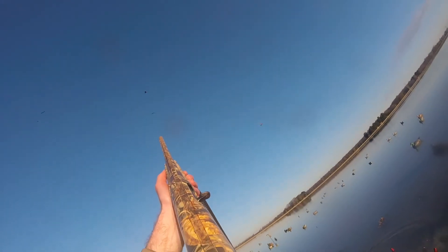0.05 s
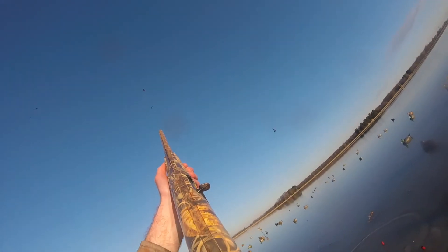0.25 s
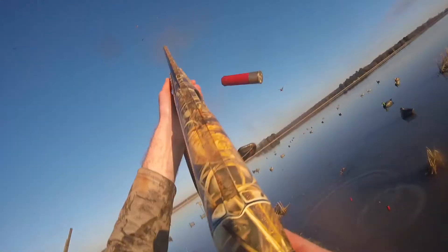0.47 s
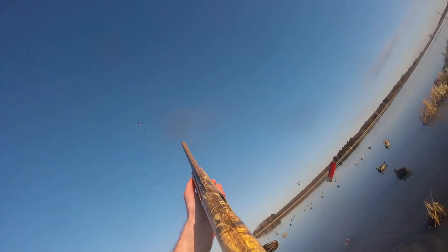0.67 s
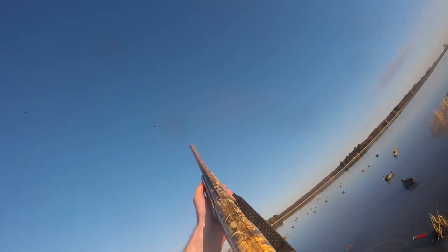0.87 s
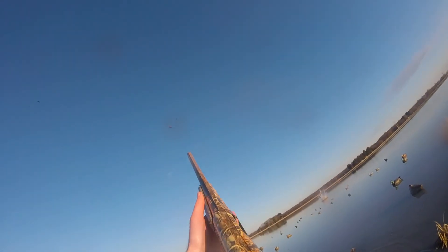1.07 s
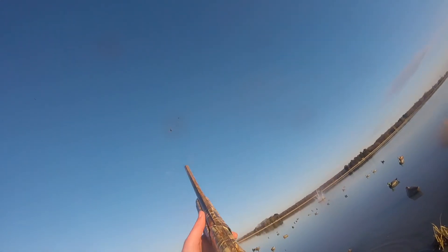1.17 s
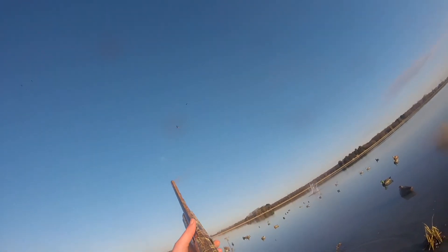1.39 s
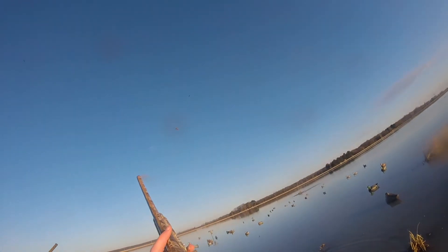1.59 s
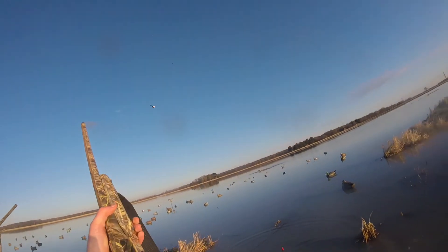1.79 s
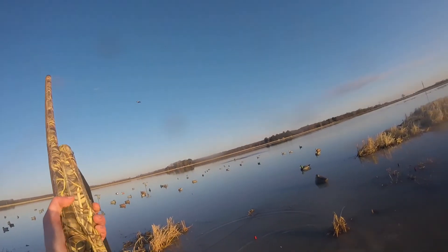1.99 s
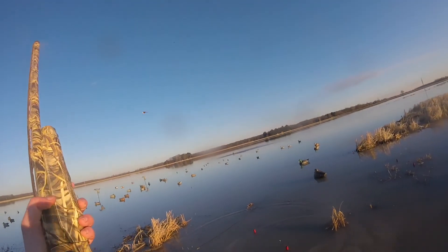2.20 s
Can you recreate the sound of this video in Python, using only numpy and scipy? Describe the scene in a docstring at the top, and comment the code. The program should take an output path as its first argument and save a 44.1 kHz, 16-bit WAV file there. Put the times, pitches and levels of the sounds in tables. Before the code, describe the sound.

Sharp, distorted shotgun shots sound close to a microphone worn by a hunter: a quick pair, the gun's action clacking, a dull knock, then a last shot after a pause. Faint echoes return across the water over low wind rumble.

```python
"""Three shotgun blasts over a marsh, heard from a small camera in a housing that the hunter wears.
Two come from a gun alongside; between them the hunter fires, the action cycles and the recoil jolts
the camera. Each blast, a shock front and a roar of gas, overloads the microphone and rings the housing.
Thin echoes return from the far shore and clothing scuffs, over low wind rumble and a faint hiss of air."""
import sys
import numpy as np
from scipy import signal
from scipy.fft import rfft, irfft, next_fast_len
from scipy.io import wavfile

SR = 44100
rng = np.random.default_rng(int(sys.argv[2]) if len(sys.argv) > 2 else 0)


def int16_out(signal):
    """Quantize to a 16-bit WAV file."""
    q = np.round(np.clip(np.atleast_2d(signal).T, -1, 1) * 32767)
    wavfile.write(sys.argv[1], SR, q.astype(np.int16))


N = 99225
TIME = np.arange(N) / SR


def from_db(db):
    """Decibels to gain."""
    return 10 ** (np.asarray(db) / 20)


def fader(rows):
    """A gain ride through (t/s, level/dB) points."""
    return from_db(np.interp(TIME, *np.transpose(rows)))


def flutter(depth_db, rate_hz):
    """A gain that wavers at random."""
    slow = signal.sosfilt(signal.butter(2, rate_hz, fs=SR, output="sos"), rng.standard_normal(N))
    return from_db(depth_db * slow / slow.std())


def burst(start, t60, hold=0, attack=1 / SR):
    """Noise with an attack, a hold and a decay, all in seconds."""
    age = TIME - start
    decay = from_db(-60 * np.maximum(age - hold, 0) / t60)
    return rng.standard_normal(N) * np.clip(age / attack, 0, 1) * decay


# resonances of the camera housing: f/Hz, width/Hz, boost/dB
HOUSING_PEAKS = [(1506, 140, 6), (2250, 270, -3), (2635, 160, 6.5), (2880, 260, 8), (3923, 180, 5),
                 (4810, 120, 5), (7320, 190, 4.5)]

def equalise(x, curve, housed=True):
    """Unit-power EQ along an (f/Hz, level/dB) curve, with the housing's ring added if housed."""
    size = next_fast_len(2 * N) // 2 * 2
    hz = np.arange(size // 2 + 1) * SR / size
    curve_hz, curve_db = np.transpose(curve)
    db = np.interp(np.log(hz + 1), np.log(curve_hz), curve_db)
    if housed:
        db += sum(boost / (1 + (2 * (hz - f) / width) ** 2) for f, width, boost in HOUSING_PEAKS)
    gain = from_db(db)
    cepstrum = irfft(np.log(gain / np.sqrt(np.mean(gain ** 2))))
    # minimum phase: nothing rings ahead of a hit
    cepstrum[1:size // 2] *= 2
    cepstrum[size // 2 + 1:] = 0
    return irfft(rfft(x, size) * np.exp(rfft(cepstrum)))[:N]


# sub-heavy tone of the wind: f/Hz, level/dB
WIND_EQ = [(8, -11), (18, 2.5), (32, 1), (55, -17), (90, -29.5), (180, -45.5), (500, -71), (2000, -100)]
# swells of the rumble: t/s, level/dB
WIND_RIDE = [(0, -26), (.12, -30.5), (.3, -36), (.42, -26.5), (.52, -21), (.57, -28), (.63, -17.5),
             (.71, -26.5), (.83, -44.5), (1.0, -36), (1.25, -40), (1.48, -25.5), (1.56, -37.5),
             (1.82, -30.5), (1.95, -34.5), (2.12, -42.5), (2.25, -58.5)]

def wind():
    """Slow buffeting on the microphone makes a low rumble."""
    return fader(WIND_RIDE) * equalise(rng.standard_normal(N), WIND_EQ, housed=False)


# soft tone of the open air: f/Hz, level/dB
AIR_EQ = [(90, 7), (200, 4), (400, 1), (900, -3.5), (1600, -4.5), (3000, -12), (5500, -16.5), (9000, -22),
          (12500, -28.5), (15500, -55)]
# the hiss dips after the shots and swells back before the last: t/s, level/dB
AIR_RIDE = [(0, -50.5), (.19, -51), (.4, -59.5), (.62, -57.5), (.69, -64), (.75, -65.5), (.9, -63.5),
            (1.15, -59.5), (1.45, -52.5), (1.8, -52.5), (2.04, -51), (2.12, -51.5), (2.25, -75)]

def air():
    """A faint, slightly gusty bed of open-air hiss."""
    hiss = equalise(rng.standard_normal(N), AIR_EQ)
    return fader(AIR_RIDE) * flutter(depth_db=0.5, rate_hz=25) * hiss


# returns from reeds and shore, one ahead of the first blast: t/s, level/dB, hold/s
ECHO_CUES = [(0.816, -56.5, .027), (0.932, -61.5, 0.035), (0.98, -52.5, 0.016), (1.024, -58.5, 0.0099),
             (1.084, -52, 0.025), (1.156, -54, 0.0037), (1.174, -52.5, .07), (1.323, -49.5, 0.023),
             (1.382, -58.5, 0.044), (1.437, -52, 0.034), (1.537, -51.5, 0.027), (1.577, -56, 0.049),
             (0.076, -54, 0.06), (2.199, -48, 0.011)]
# thin upper-mid tone of the returns: f/Hz, level/dB
ECHO_EQ = [(200, -12.5), (900, -10), (1700, 1.5), (2200, -3), (2700, -1.5), (3450, 0), (3750, -11),
           (4250, -2), (5100, -12), (5800, -3.5), (6500, -16), (11000, -31), (15000, -48.5)]

def echoes():
    """Reports come back thin and smeared from reed beds and the tree line."""
    returns = sum(from_db(db) * burst(t, t60=0.17, hold=hold, attack=0.0022)
                  for t, db, hold in ECHO_CUES)
    return equalise(returns, ECHO_EQ)


# shots, the second the hunter's own:
# t/s, crack/dB, pressure pulse/dB, pulse length/s, gas roar/dB, reflection/dB, tail/dB, tail t60/s
SHOT_CUES = [(0.2108, 15, -7, .0008, -0.5, -14.5, -21.5, 0.23),
             (0.4495, 20, -14, 0.00058, 3, -26, -30.5, 0.35),
             (2.0437, 16.5, -8, 0.00055, 2, -17.5, -22.5, 0.25)]
# tone of the blast, one curve a shot: f/Hz, level/dB
SHOT_EQS = [
    [(40, -11.5), (130, -0.5), (320, 1), (480, -2.5), (750, -2.5), (1080, 4.5), (1500, -9), (2000, -1),
     (2800, -5.5), (4000, -1.5), (5700, -14), (8500, -15.5), (15000, -27)],
    [(40, -8.5), (240, 2.5), (600, -9), (780, -4), (1450, 0), (1900, -7), (2500, -3.5), (3100, 3),
     (4300, -6), (4900, 0), (5800, -13), (7500, -9), (15000, -29)],
    [(40, -12), (300, 2.5), (500, -3), (700, 1), (950, -10.5), (1300, -0.5), (1600, -4.5), (2400, -1.5),
     (3900, 1), (5200, -12.5), (7000, -2), (15000, -40)],
]
# tone of the scatter off the marsh: f/Hz, level/dB
TAIL_EQ = [(50, -0.5), (120, -1), (300, -2), (700, -3), (1300, 0), (2200, -0.5), (4500, -5.5),
           (6200, -10.5), (8000, -17.5), (15000, -42)]

def blasts():
    """A shock front with suction behind it, a short roar of gas, its reflection, and marsh scatter."""
    direct, tails = 0, 0
    highpass = signal.butter(2, 5500, "high", fs=SR, output="sos")
    for cue, shot_eq in zip(SHOT_CUES, SHOT_EQS):
        t, crack_db, pulse_db, pulse_s, roar_db, reflection_db, tail_db, tail_t60 = cue
        front = (TIME >= t) * 1.0
        crack = from_db(crack_db) * np.diff(front, prepend=0)
        phase = np.maximum(TIME - t, 0) / pulse_s
        pulse = from_db(pulse_db) * front * (1 - phase) * np.exp(-phase)
        roar = from_db(roar_db) * burst(t, t60=0.012, hold=0.0014, attack=0.0005)
        reflection = from_db(reflection_db) * burst(t + 0.0065, t60=0.044)
        direct += equalise(roar + reflection - (crack + pulse), shot_eq)
        sizzle = from_db(-5.5) * signal.sosfilt(highpass, burst(t, t60=0.16, attack=0.012))
        wash = burst(t, t60=tail_t60, attack=0.012)
        tails += from_db(tail_db) * (wash + sizzle)
    scatter = flutter(depth_db=3, rate_hz=450)  # separate returns within the tail
    return direct + equalise(tails * scatter, TAIL_EQ)


# clacks of the guns' moving parts: t/s, level/dB, t60/s
CLACK_CUES = [(0.336, -42.5, .04), (.3465, -42.5, 0.035), (0.4449, -15.5, 0.043), (0.477, -21.5, 0.034),
              (0.602, -43, .012), (.6095, -43, 0.0084), (0.6262, -47.5, 0.0049), (2.166, -56, 0.012)]
# bright, metallic tone of the action: f/Hz, level/dB
CLACK_EQ = [(200, -15.5), (1200, -10), (2900, 2), (5000, -1), (7000, 2), (9000, -18), (15000, -16.5)]

def gun_actions():
    """Bolt and lock snap home in short, bright rattles."""
    clacks = sum(from_db(db) * burst(t, t60) for t, db, t60 in CLACK_CUES)
    return equalise(clacks, CLACK_EQ)


# modes of the camera mount: f/Hz, level/dB, t60/s
MOUNT_MODES = [(182, -18, 0.063), (1378, 0, 0.0076), (2470, -12.5, 0.0094), (6370, -20.5, 0.0097)]
# tone of the grit on the knock: f/Hz, level/dB
GRIT_EQ = [(200, 2.5), (1400, -2.5), (3000, 4), (6500, 0.5), (10000, -14.5), (15000, -13.5)]

def mount_knock():
    """At the crest of the recoil the mount knocks: a tight ring with a gritty edge."""
    start_s, attack_s = 0.5955, 0.0015
    age = np.maximum(TIME - start_s, 0)
    ring = sum(np.sin(2 * np.pi * hz * age) * from_db(db - 60 * age / t60)
               for hz, db, t60 in MOUNT_MODES)
    grit = equalise(burst(start_s, t60=0.006, hold=attack_s, attack=attack_s), GRIT_EQ, housed=False)
    return ring * np.minimum(age / attack_s, 1) + from_db(-20) * grit


# shoves on the camera, from recoil and then from lowering the gun: t/s, level/dB
JOLT_CUES = [(0.5963, -2), (1.799, -31.5)]

def jolts():
    """Each shove moves the camera and it swings back, making a low thump."""
    shove_width_s, rebound_width_s, rebound_delay_s = 0.0023, 0.004, 0.013
    thumps = 0
    for t, db in JOLT_CUES:
        shove = np.exp(-0.5 * ((TIME - t) / shove_width_s) ** 2)
        rebound = from_db(-0.5) * np.exp(-0.5 * ((TIME - t - rebound_delay_s) / rebound_width_s) ** 2)
        thumps += from_db(db) * (shove - rebound)
    return thumps


# brushes of clothing and stock: t/s, level/dB, hold/s
SCUFF_CUES = [(0.663, -53.5, 0.034), (0.989, -53.5, .004), (1.164, -51, 0.0033), (1.794, -54, 0.058),
              (2.145, -41, 0.0027), (2.209, -54, 0.017)]
# muffled tone of the handling: f/Hz, level/dB
SCUFF_EQ = [(100, -1), (320, 2), (550, 0), (800, -0.5), (1500, -10.5), (3000, -18.5), (7000, -33),
            (15000, -42)]

def scuffs():
    """Sleeve and stock brush dully as the gun is moved."""
    brushes = sum(from_db(db) * burst(t, t60=0.047, hold=hold, attack=0.00084)
                  for t, db, hold in SCUFF_CUES)
    return equalise(brushes, SCUFF_EQ)


def scene():
    """Guns, handling and ambience, mixed in mono at one microphone."""
    guns = blasts() + gun_actions() + echoes()
    handling = scuffs() + mount_knock() + jolts()
    ambience = wind() + air()
    return (guns + handling + ambience)[None]


def record(dry):
    """The blasts clip flat in the overloaded microphone; a steep low-pass takes off the top."""
    cutoff_hz = 15700
    lowpass = signal.ellip(10, 0.1, 70, cutoff_hz, fs=SR, output="sos")
    return signal.sosfilt(lowpass, np.clip(dry, -1, 1))


dry = scene()
out = record(dry)
int16_out(out)
```